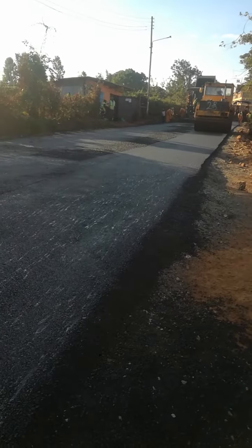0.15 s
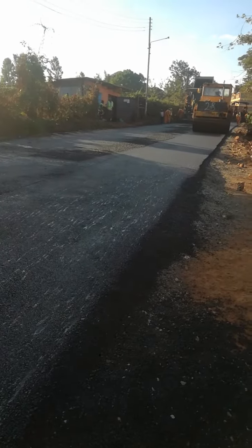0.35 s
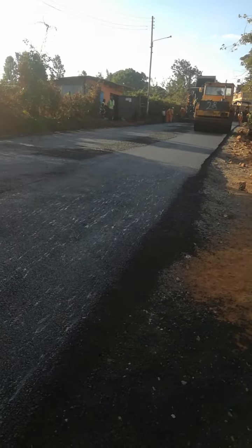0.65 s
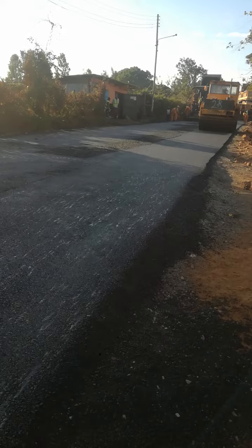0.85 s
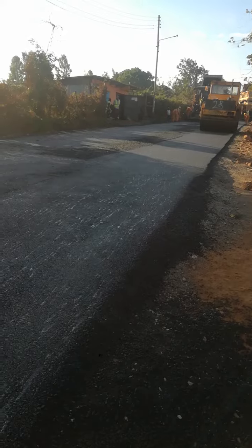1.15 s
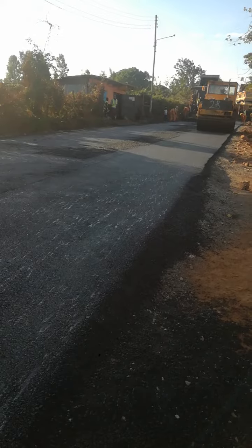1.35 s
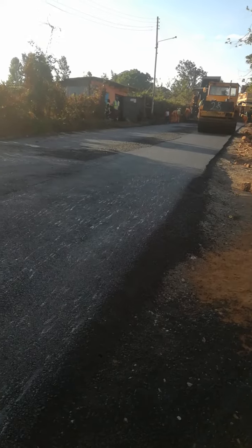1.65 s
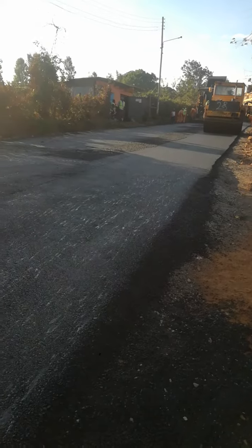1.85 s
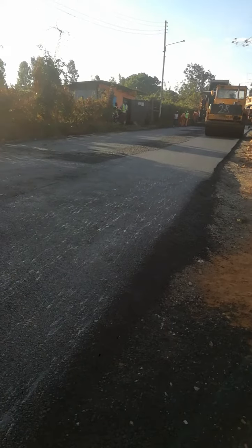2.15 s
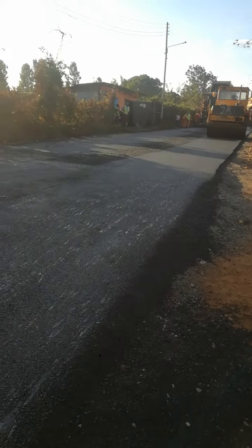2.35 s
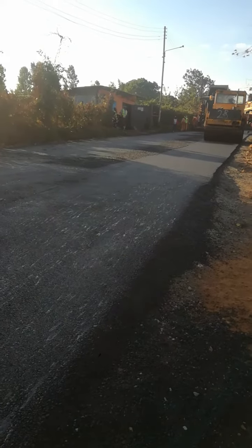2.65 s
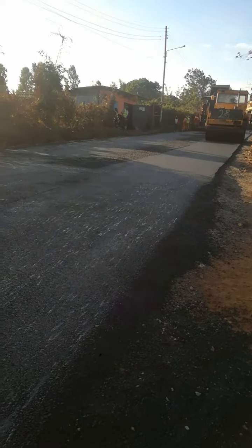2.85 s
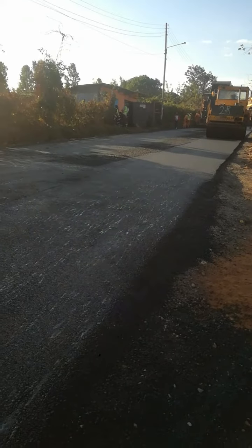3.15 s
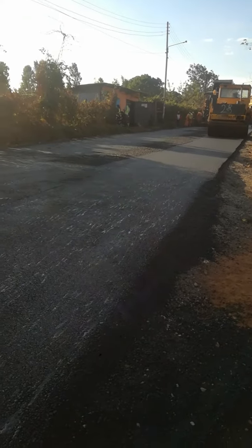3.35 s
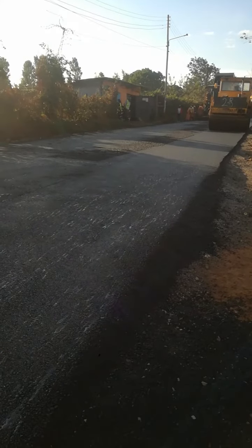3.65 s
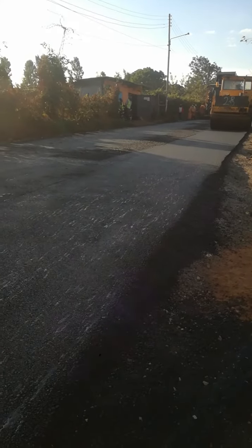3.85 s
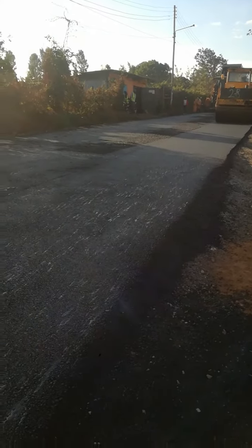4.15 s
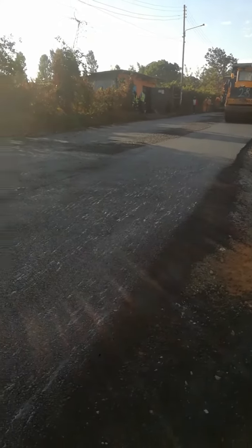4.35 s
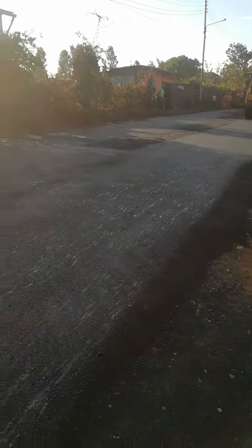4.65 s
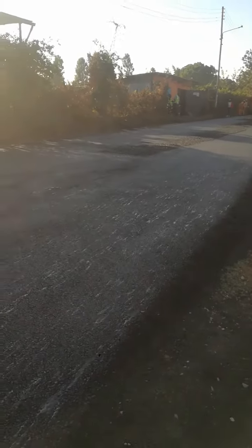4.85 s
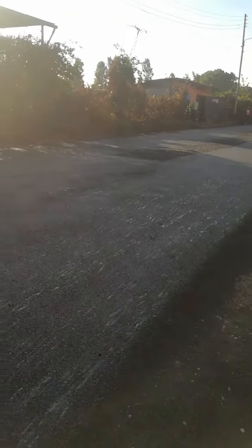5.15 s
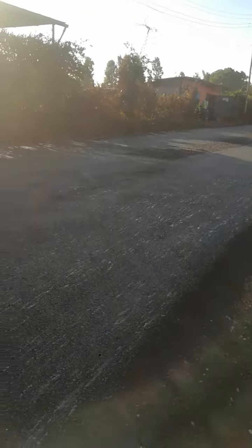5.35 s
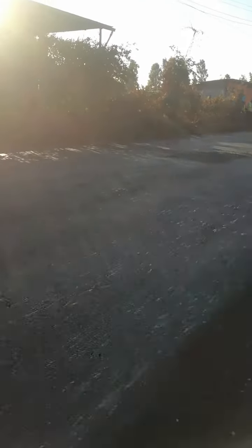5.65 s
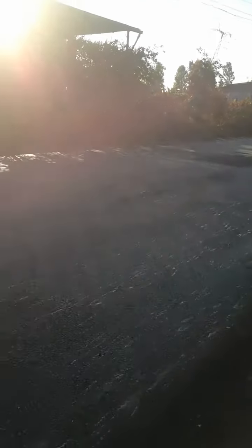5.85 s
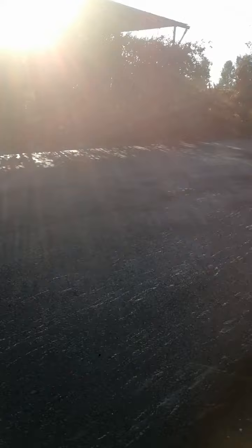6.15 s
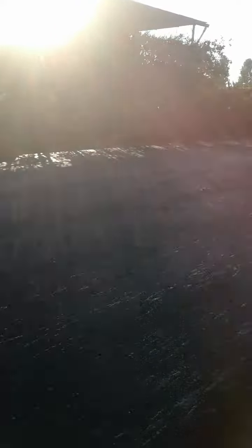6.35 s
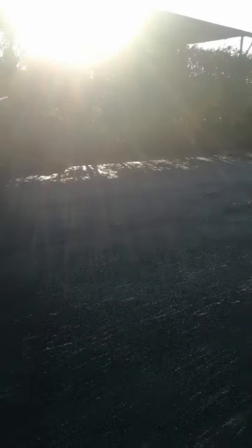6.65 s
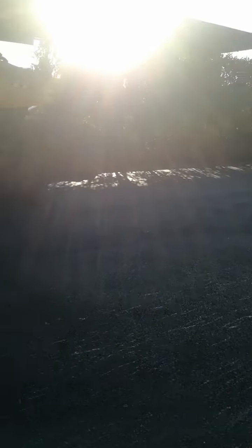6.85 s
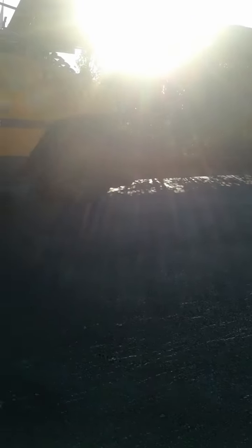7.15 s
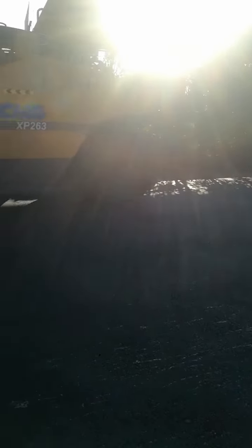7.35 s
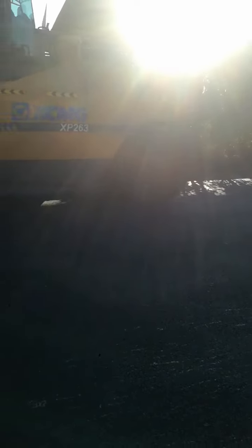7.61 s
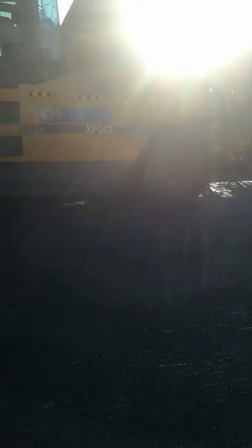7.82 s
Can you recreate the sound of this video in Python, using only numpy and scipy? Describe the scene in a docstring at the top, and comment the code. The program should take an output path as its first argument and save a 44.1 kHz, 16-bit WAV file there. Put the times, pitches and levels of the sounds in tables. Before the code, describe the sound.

A heavy diesel road roller drones loudly and steadily close by, with broad engine roar, faint metallic rattle and soft wind buffets on the microphone.

```python
"""Two road rollers at work

Two diesel rollers work on fresh asphalt while a hand-held phone turns from the far one to the near one.
Light gusts buffet its two microphone ports: shaped noise that swells, plus short sine thumps.
A broad roar of fans and engine blocks is random noise with a changing colour, and some housings sing in it.
The far roller throbs slowly, built from sines, and rattles a loose panel with one blow a turn.
The near six-cylinder booms at its firing rate: strong sines there, and weak ones from uneven cylinders."""
import sys
import numpy as np
from scipy import signal
from scipy.fft import rfft, irfft, next_fast_len
from scipy.io import wavfile
from scipy.ndimage import uniform_filter1d

SR = 44100
rng = np.random.default_rng(int(sys.argv[2]) if len(sys.argv) > 2 else 0)


def output_pcm(signal):
    """Save a mono or channel-first signal as 16-bit PCM at the path in sys.argv[1].

    Samples are clipped to [-1, 1] before scaling.
    """
    pcm = np.clip(np.atleast_2d(signal).T, -1, 1) * 32767
    wavfile.write(sys.argv[1], SR, np.round(pcm).astype(np.int16))


N = 351918  # length in samples, about 8 seconds

# Turn of the phone, and the top of the sound's frequency range.
TURN_START_S, TURN_END_S = 4.1, 5.9
EDGE_HZ = 15780

# Breeze under the gusts. Each row: time in seconds, level in dB before the trims in wind().
BREEZE = [(0, -42.5), (.7, -40), (4, -36), (6, -37), (6.6, -53.5), (7.98, -50.5)]
BREEZE_WAVER_DB = 3.5
# Gusts over the breeze. Each row: start in seconds, length in seconds, level in dB before the same trims.
GUSTS = [(.75, 0.033, -31), (.92, .07, -26), (2.04, 0.025, -36), (2.13, 0.022, -34), (2.555, 0.087, -27),
         (2.71, 0.025, -29), (3.09, 0.022, -41), (3.29, 0.027, -33), (3.78, 0.049, -32), (3.98, 0.044, -30),
         (4.15, .12, -35), (4.285, 0.038, -27), (5.13, 0.053, -33), (5.2, 0.019, -33), (5.47, 0.023, -39),
         (6.17, 0.033, -40)]
GUST_RISE_S, GUST_FALL_S = 0.0069, 0.019
# Colour of the wind noise. Each row: frequency in Hz, relative level in dB.
GUST_COLOUR = [(8, -9), (22, 3.5), (50, 12.5), (100, 3.5), (200, -1), (350, -8), (600, -23.5), (1000, -27),
               (2000, -45), (6000, -100)]
# How alike the wind is at both ports. Each row: frequency in Hz, shared part of the power from 0 to 1.
GUST_SAME = [(15, .99), (40, 1), (85, .88), (150, .55), (300, 0.065), (600, .01)]
# The hardest buffets. Each row: start in seconds, peak in dB, starting pitch in Hz, left minus right in dB.
THUMPS = [(.962, -17, 130, 1), (.968, -25, 380, 2), (1.8, -21, 110, 1), (2.565, -24, 260, 2),
          (2.595, -20, 35, 0), (2.603, -15, 110, 3), (2.62, -17, 140, -3), (2.7, -19, 38, 0),
          (2.716, -13, 110, 3), (2.727, -27, 450, 2), (3.997, -21, 150, 1), (4.001, -24, 800, 1),
          (4.24, -19, 120, 1), (4.305, -17, 130, 1)]

# Roar common to both ports. Each row: frequency in Hz, level in dB per Hz with the phone toward
# the far roller, the same toward the near one. ROAR_CHANGE and chance shifts are added.
ROAR_COMMON = [(12, -68, -68), (35, -59, -59), (79.4, -70, -58.5), (152, -51.5, -51.5), (270, -68, -71),
               (410, -70.5, -61), (472, -67.5, -80), (583, -75.5, -87.5), (700, -73, -72),
               (890, -70.5, -69), (1205, -68.5, -70.5), (1760, -76, -77), (2200, -81.5, -82.5),
               (2930, -84, -83), (5800, -98, -99), (10400, -111, -111), (15700, -112, -111)]
# Roar arriving with opposite sign at the two ports. Each row: the same as for the common roar.
ROAR_OPPOSED = [(12, -78, -83), (60, -74.5, -75.5), (150, -70, -65.5), (300, -76.5, -75.5),
                (400, -64.5, -73), (500, -76, -77), (900, -73, -75), (1400, -81, -81.5), (2200, -79, -80),
                (3000, -81.5, -83), (4430, -89, -90.5), (8000, -105, -106), (11000, -111, -111),
                (15700, -111, -111)]
# Balance of the roar. Each row: frequency in Hz, left minus right in dB toward the far roller, toward the near.
ROAR_BALANCE = [(60, 1, 5), (380, -1.5, -3), (700, 6, 2), (1290, -1.5, 0), (4400, 1, 2), (8120, 1.5, 5.5),
                (15000, -0.5, 4.5)]
# Share of the opposed roar due to travel time between the ports.
# Each row: frequency in Hz, share from -1 to 1 where positive means left first.
TRAVEL = [(60, 0.6), (300, .5), (600, .6), (1100, .6), (1800, .4), (2600, -.4), (4600, -.3), (9000, -.05)]
# Rise and fall of the whole roar. Each row: time in seconds, change in dB.
ROAR_CHANGE = [(0, .3), (.5, 0), (2, 1.5), (3, .5), (4.2, 1), (5, 1.5), (5.85, 2.5), (5.95, .5),
               (7.98, -0.35)]

# Housings that sing in the roar. Each row: frequency in Hz, width in Hz of each of two resonance passes.
SINGING = [(381, 10), (1140, 36), (2376, 24), (1000, 120), (405, 30), (2750, 90)]
# Spells of singing, one list for each housing. Each row: start in seconds, length in seconds, level in dB.
SINGING_SPELLS = [
    [(2.2, 0.98, -51), (5.12, 0.42, -39.5), (5.9, 0.72, -46.5), (7.3, 0.87, -53.5)],
    [(0, 0.28, -47), (1.4, 1.45, -52.5), (3.8, 0.53, -48), (6.88, 0.99, -50)],
    [(5.12, .4, -60), (6.88, 1.5, -59.5)],
    [(1, 2, -53.5), (3.2, 2.2, -48.5)],
    [(1.4, 3.7, -47.5), (3.1, 0.21, -53), (5.5, 0.45, -48.5)],
    [(4.403, 1.8, -62)],
]
# Singing that never stops under the spells. Each entry: level of one housing in dB.
SINGING_QUIET_DB = [-61, -60.5, -72, -62, -55.5, -73.5]
SING_RISE_S, SING_FALL_S = 0.08, 0.2
SING_EVENNESS = 0.5  # 0 = noise in a resonance, 1 = steady whine

FAR_SHAFT_HZ = 26.13  # average turns a second
# Sines of the far throb. Each entry: level in dB of shaft orders 1 to 13, before FAR_CHANGE.
FAR_ORDERS_DB = [-40, -43.5, -50, -43.5, -44, -40.5, -37, -36, -51.5, -57, -50.5, -44, -49.5]
# Rise and fall of the far throb. Each row: time in seconds, change in dB.
FAR_CHANGE = [(0, -5), (1, 0), (2, 1), (3, -2.5), (4, -7.5), (5, -3.5), (6, -7), (7, -3.5), (7.98, -3)]
# Pitches at which the loose panel rings. Each entry: frequency of one mode in Hz.
PANEL_HZ = [1992, 3150, 3190, 3450, 3760, 4350, 4650]
# Ringing of those modes. Each row: time to fall by 60 dB in seconds, relative level in dB.
PANEL_RING = [(.05, -1), (.06, -3), (.08, -2), (.025, -9), (.04, -10), (.012, -12), (.02, -14)]
# Spells in which the panel works loose. Each row: start in seconds, length in seconds, level in dB.
RATTLE_SPELLS = [(0, 0.099, -53.5), (.21, 0.17, -48), (.47, .15, -55), (1.06, 0.041, -49),
                 (1.15, 0.18, -61.5), (1.45, .1, -53.5), (1.78, 0.1, -54.5), (2.2, 0.055, -54),
                 (2.5, 0.036, -53), (3.5, .3, -55.5), (6.1, 0.043, -56.5)]
RATTLE_RISE_S, RATTLE_FALL_S = 0.017, 0.044
RATTLE_QUIET_DB, RATTLE_FADE_DB_PER_S = -59, -1.3  # the rattle between spells, at the start and its drift

# Firing rate of the near roller. Each row: time in seconds, rate in Hz before a slight drift.
FIRING = [(0, 60.71), (.5, 60.66), (.9, 60.93), (1.2, 61.36), (1.6, 62.33), (2, 62.5), (2.6, 62.38),
          (3.2, 62.54), (4.1, 62.58), (5.25, 63.45), (6, 63.19), (6.5, 62.84), (7.3, 62.73), (7.98, 62.15)]
# Boom of the near roller. Each row: time in seconds, then levels in dB of firing orders 1, 2 and 3.
FIRING_ORDERS = [(0, -22, -32, -39), (.3, -18.5, -34.5, -34.5), (.8, -18, -31, -34.5), (1.6, -17, -32, -39),
                 (2.6, -17, -34, -38), (3.2, -16, -31.5, -38), (4.2, -15, -29.5, -37), (4.7, -15, -33, -39),
                 (5.3, -14.2, -29.5, -31.5), (5.8, -14.5, -28, -29), (5.97, -17, -35.5, -32.5),
                 (6.7, -16.5, -43, -33.5), (7.6, -15.5, -37, -37), (7.98, -17.5, -35.5, -40)]
# Extra tones from unequal cylinders. Each entry: pitch in sixths of the firing rate.
UNEVEN_ORDERS = [4, 7, 9, 10, 11, 20, 22, 24, 26, 28, 30, 36]
# Levels of those tones. Each entry: level in dB before UNEVEN_CHANGE.
UNEVEN_LEVELS_DB = [-45.5, -43.5, -36, -33, -40.5, -52, -50, -53.5, -50, -50.5, -46.5, -54.5]
# How far the uneven tones stand out. Each row: time in seconds, change in dB.
UNEVEN_CHANGE = [(0, -12.5), (2, -11), (4, -8.5), (5, -14), (6, -7.5), (6.5, -6.5), (7.98, -4)]


def gain_of(db):
    """Turns decibels into a gain."""
    return 10 ** (np.asarray(db) / 20)


def evened(x):
    """Scales a signal to an rms of 1."""
    return x / np.sqrt(np.mean(x ** 2) + 1e-20)


def read(points, hz):
    """Reads a curve of frequencies and values on a log-frequency axis."""
    f, value = points
    return np.interp(np.log(hz + 1), np.log(f + 1), value)[:, None]


def follow(rows, t=None):
    """Reads the columns of a time table at the times t, by default at every sample."""
    s, *columns = np.transpose(rows)
    t = np.arange(N) / SR if t is None else t
    return [np.interp(t, s, c) for c in columns]


def drift(rate_hz):
    """Slow random wandering of rms 1, made from noise without its fast part."""
    count = N // 64 + 2
    steps = rfft(rng.standard_normal(count))
    hz = np.arange(len(steps)) * SR / N
    slow = irfft(steps / (1 + (hz / rate_hz) ** 4), count)
    return evened(np.interp(np.arange(N) / 64, np.arange(len(slow)), slow - slow.mean()))


def spells(rows, rise_s, fall_s):
    """Sums the gains of spells that rise, hold and die away."""
    t = np.arange(N) / SR
    total = np.zeros(N)
    for start, length, db in rows:
        rise = (np.minimum(t - start, 0) / rise_s) ** 2
        fall = np.maximum(t - start - length, 0) / fall_s
        total += gain_of(db) * np.exp(-rise - fall)
    return total


def ring(x, hz, width):
    """A fixed resonance of gain 1: a wider one rings for a shorter time."""
    r = np.exp(-np.pi * width / SR)
    return 2 * signal.lfilter([1 - r], [1, -r * np.exp(2j * np.pi * hz / SR)], x).real


def turned(t):
    """Share of the turn toward the near roller, easing from 0 to 1."""
    share = np.clip((t - TURN_START_S) / (TURN_END_S - TURN_START_S), 0, 1)
    return np.sin(np.pi / 2 * share) ** 2


def blend(rows, hz, turn):
    """Mixes the far and near columns of a spectrum table by the turn of the phone."""
    f, far, near = np.transpose(rows)
    return (1 - turn) * read((f, far), hz) + turn * read((f, near), hz)


def pair(common_db, opposed_db, travel, left_db):
    """Two-port noise from random short-time spectra: a common part and an opposed part, in dB per Hz."""
    a, b, c, d = rng.standard_normal((N // 128 + 5, 257, 4)).T
    common = a + 1j * b
    # a delay between the ports puts their difference a quarter cycle ahead of their sum
    delayed = 1j * travel * common
    unrelated = np.sqrt(1 - travel ** 2) * (c + 1j * d)
    opposed = gain_of(opposed_db) * (delayed + unrelated)
    common = gain_of(common_db) * common
    left = (common + opposed) * gain_of(left_db / 2)
    right = (common - opposed) * gain_of(-left_db / 2)
    spectra = np.array([left, right])
    return signal.istft(spectra, SR, nperseg=512, noverlap=384, scaling="psd")[1][:, :N]


def ports(tone, late_s, right_db):
    """The right port hears a source a little later and at its own level."""
    late = np.interp(np.arange(N) - late_s * SR, np.arange(N), tone)
    return np.array([tone, gain_of(right_db) * late])


def wind():
    """Lumpy air pressure on the ports: alike in the bass, unrelated above."""
    hz = np.fft.rfftfreq(N, 1 / SR)
    colour = gain_of(read(np.transpose(GUST_COLOUR), hz)[:, 0])
    same = np.clip(read(np.transpose(GUST_SAME), hz)[:, 0], 0, 1)
    common, *own = rfft(rng.standard_normal((3, N)))
    eddies = colour * (np.sqrt(same) * common + np.sqrt(1 - same) * np.array(own))
    # large eddies make the bass, small ones the rest
    large_share = 1 / (1 + (hz / 130) ** 4)
    large = evened(irfft(large_share * eddies, N))
    small = evened(irfft((1 - large_share) * eddies, N))
    breeze = gain_of(follow(BREEZE)[0] + BREEZE_WAVER_DB * drift(4.1))
    gust_db = 20 * np.log10(breeze + spells(GUSTS, GUST_RISE_S, GUST_FALL_S))
    # small eddies follow each gust at once; large ones answer more slowly and by less
    slow_db = -42.0 + 0.54 * (uniform_filter1d(gust_db, 2500) + 40.5)
    lumps = gain_of([2.2 * drift(40.0), 2.2 * drift(40.0)])
    return gain_of(gust_db - 1.0) * lumps * small + gain_of(slow_db + 7.0) * large


def thumps():
    """Each buffet is a short swell of pushes and pulls, rising in pitch as the eddy breaks."""
    out = np.zeros((2, N))
    for start, db, hz, left_db in THUMPS:
        cycles = np.arange(0, 2, hz / SR)  # counted at the starting pitch
        push = np.sin(2 * np.pi * cycles * (1 + 0.13 * cycles)) * np.hanning(len(cycles))
        gains = gain_of([[db + left_db / 2], [db - left_db / 2]])
        out[:, round(start * SR):][:, :len(push)] += gains * push
    return out


def roar():
    """Fan and block noise; colour and stereo picture change as the phone turns."""
    hz = np.fft.rfftfreq(512, 1 / SR)
    t = np.arange(N // 128 + 5) * 128 / SR
    turn = turned(t)
    # small patches of the spectrum swell and fade, and the treble flickers
    patches = rng.standard_normal((len(t), 257)).T
    patches = evened(uniform_filter1d(uniform_filter1d(patches, 7, 0), 24, 1))
    flicker = evened(uniform_filter1d(rng.standard_normal(len(t)), 8))
    flicker = flicker * np.clip(hz / 4000, 0, 1)[:, None]
    change_db = follow(ROAR_CHANGE, t)[0] + 0.69 * patches + 0.6 * flicker
    common_db = blend(ROAR_COMMON, hz, turn) + change_db
    opposed_db = blend(ROAR_OPPOSED, hz, turn) + change_db
    travel = np.clip(read(np.transpose(TRAVEL), hz), -1, 1)
    return pair(common_db, opposed_db, travel, blend(ROAR_BALANCE, hz, turn))


def singing():
    """Noise in resonances, partly self-sustained and so evened out, that swells in spells."""
    out = np.zeros(N)
    for (hz, width), rows, quiet_db in zip(SINGING, SINGING_SPELLS, SINGING_QUIET_DB):
        noise = ring(ring(rng.standard_normal(N), hz, width), hz, width)
        whine = signal.hilbert(noise, next_fast_len(N))[:N]
        # dividing by its own envelope makes the noise steadier
        whine = evened(whine.real / (abs(whine) + 1e-9) ** SING_EVENNESS)
        level = gain_of(quiet_db) + spells(rows, SING_RISE_S, SING_FALL_S)
        out += level * gain_of(1.2 * drift(9.9)) * whine
    return out


def far_throb(turns):
    """Sines at multiples of the shaft rate, whose levels waver on the way."""
    throb = np.zeros(N)
    for k, db in enumerate(FAR_ORDERS_DB, 1):
        throb += gain_of(db + 1.28 * drift(1.6)) * np.cos(2 * np.pi * (k * turns + rng.random()))
    return np.sqrt(2) * gain_of(follow(FAR_CHANGE)[0]) * throb


def panel_rattle(turns):
    """One blow a turn with changing force, then weaker chatter as the panel settles, rings its modes."""
    force = gain_of(1.6 * rng.standard_normal(400))[turns.astype(int)]
    blows = np.diff(np.floor(turns), prepend=0)
    settling = 0.069 * np.exp(-(turns % 1) / 0.69) * rng.standard_normal(N)
    chatter = force * (blows + settling)
    rattle = np.zeros(N)
    for hz, (t60, db) in zip(PANEL_HZ, PANEL_RING):
        mode = ring(ring(chatter, hz, 2.2 / t60), hz, 600)
        rattle += gain_of(db) * evened(mode)
    quiet = gain_of(RATTLE_QUIET_DB + RATTLE_FADE_DB_PER_S * np.arange(N) / SR)
    return (spells(RATTLE_SPELLS, RATTLE_RISE_S, RATTLE_FALL_S) + quiet) * rattle


def far_roller():
    """The throb and the rattle share one slightly unsteady shaft."""
    turns = np.cumsum(FAR_SHAFT_HZ * (1 + 0.00296 * drift(1.2))) / SR
    return far_throb(turns), panel_rattle(turns)


def near_roller():
    """Clean firing orders, smeared by the exhaust pipe, plus weak orders of the cam cycle."""
    rate_hz = follow(FIRING)[0] * (1 + 0.0019 * drift(4.25))
    phase = 2 * np.pi * np.cumsum(rate_hz) / SR
    smear = 0.9  # radians; the pipe spreads each pulse, higher orders come first
    boom = np.zeros(N)
    for k, db in enumerate(follow(FIRING_ORDERS), 1):
        waver_db = 0.2 * k * drift(10.0) + 0.68 * (k - 1) * drift(2.2)
        boom += gain_of(db + waver_db) * np.cos(k * phase + smear * k * (k - 1))
    cam = phase / 6  # six firings in each cam cycle
    uneven = np.zeros(N)
    for k, db in zip(UNEVEN_ORDERS, UNEVEN_LEVELS_DB):
        uneven += gain_of(db + 2.8 * drift(0.6)) * np.cos(k * cam + rng.uniform(0, 2 * np.pi))
    return np.sqrt(2) * (boom + gain_of(follow(UNEVEN_CHANGE)[0]) * uneven)


def scene():
    """Adds all sources at the two ports, each with its delay in seconds and right-port level in dB."""
    air = wind() + thumps()
    machines = roar() + ports(singing(), 0.00006, 0.06)
    throb, rattle = far_roller()
    far = ports(throb, 0.00009, 0.21) + ports(rattle, 0.00006, -6.5)
    near_late_s = 0.0001 + 0.00008 * turned(np.arange(N) / SR)
    return air + machines + far + ports(near_roller(), near_late_s, 0.2)


def record(dry):
    """Removes everything above the band edge with a smooth low-pass filter."""
    taps = signal.firwin(511, EDGE_HZ, window=("kaiser", 9), fs=SR)
    # mirrored ends let the sound run on past the start and the finish
    running = np.pad(dry, ((0, 0), (255, 255)), "reflect", reflect_type="odd")
    return signal.oaconvolve(running, taps[None], "valid", axes=1)


dry = scene()
out = record(dry)
output_pcm(out)
```